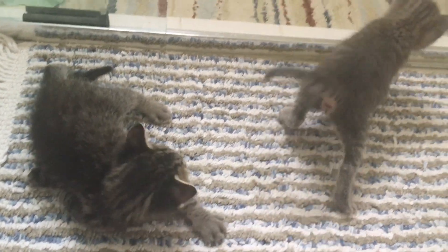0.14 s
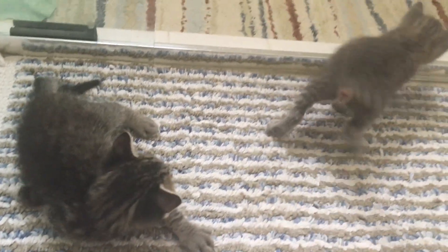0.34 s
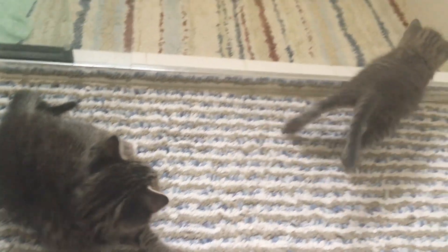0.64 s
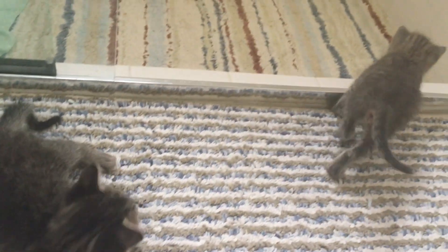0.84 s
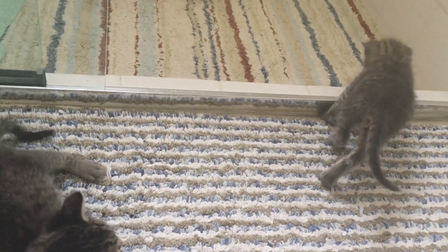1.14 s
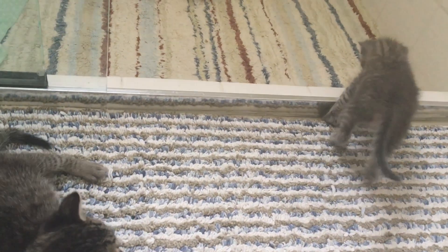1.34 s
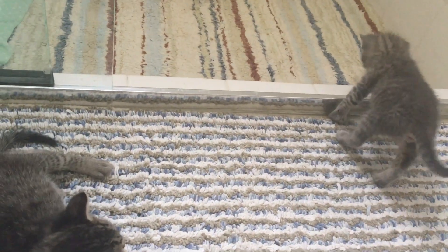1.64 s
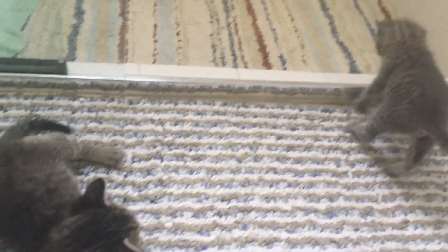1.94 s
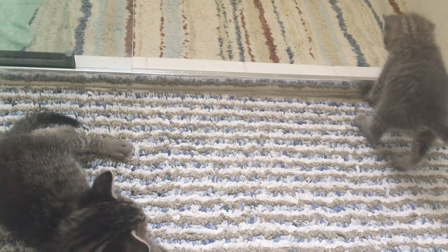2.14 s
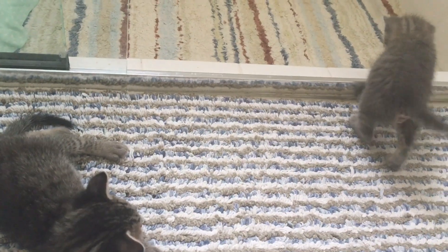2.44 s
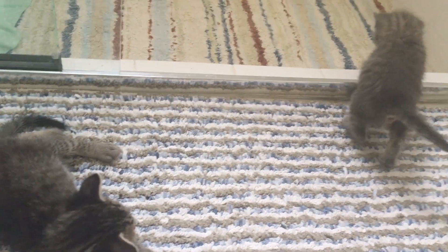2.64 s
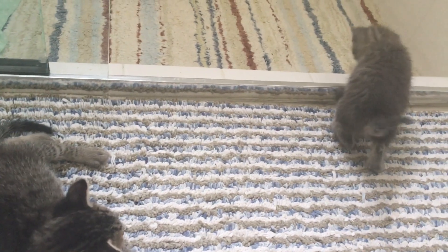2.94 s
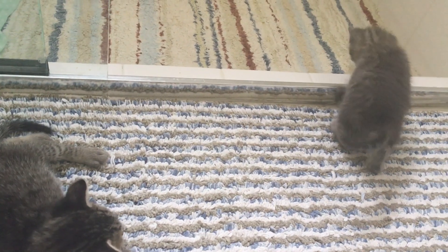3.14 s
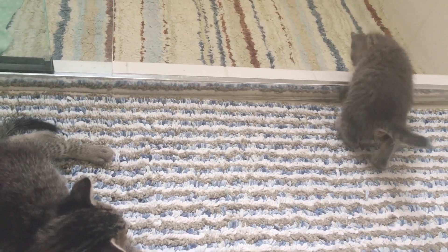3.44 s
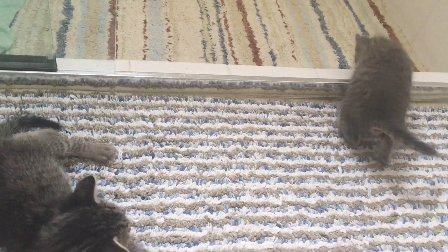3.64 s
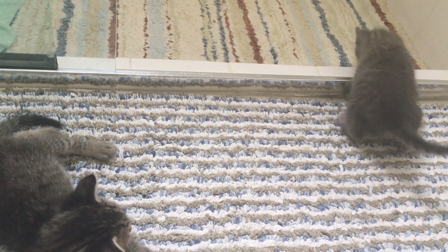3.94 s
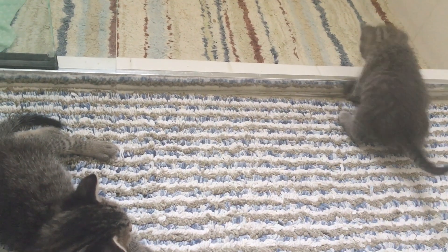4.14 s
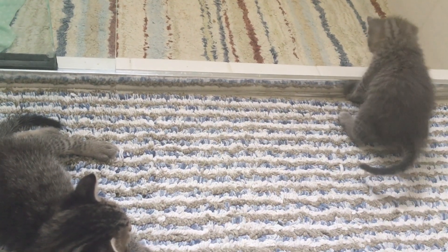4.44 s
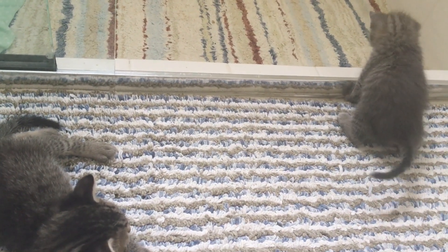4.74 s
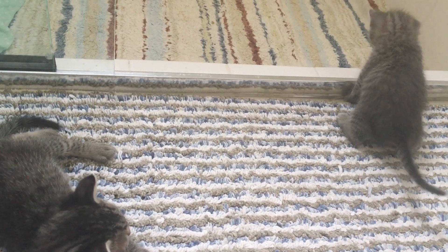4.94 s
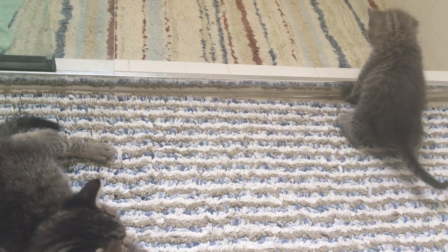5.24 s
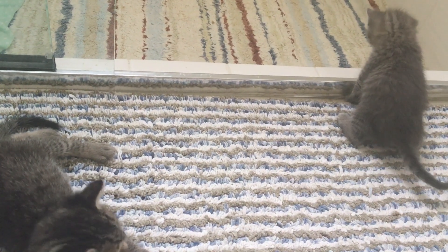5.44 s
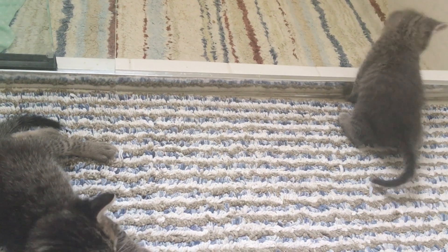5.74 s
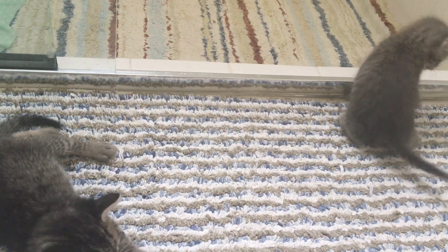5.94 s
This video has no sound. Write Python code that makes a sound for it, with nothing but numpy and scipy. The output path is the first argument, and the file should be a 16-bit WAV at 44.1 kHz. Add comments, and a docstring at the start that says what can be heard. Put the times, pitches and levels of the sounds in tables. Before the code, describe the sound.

A small, fairly live room, heard close to a rug. A brief scuff opens at 0 s, then a soft stroke swells around 0.3 s and firmer claw scratches follow at 0.7 and 0.9 s, fibres snapping over dragged backing. At 1.1-1.3 s paws knock and slide on a door sill; two more knocks with claw ticks come near 1.6 s. From 1.6 to 3.4 s, soft bodies land with low booms amid raspy rug strokes, strongest around 2.9 s, with one sharper sill tap at 2.25 s. After 3.7 s, a faint long rug stroke lies beneath dull knocks, short slides and claw ticks, clustered at 4.05-4.3 s and heaviest at 4.7-4.9 s. Then only sparse light ticks, and a final tap near 5.97 s. Steady hum, rumble and faint hiss persist; a distant engine drone emerges from 1.5 s, peaks near 3.9 s and keeps sinking in pitch.

```python
"""A kitten plays on a looped rug near the microphone, by a door sill in a small, fairly live room. First claws
comb the pile in strokes of snapping fibres and dragged backing; from 1.1 s paws knock and slide on the sill
too, as short puffs of stick-slip noise. From 1.6 to 3.4 s its body lands with a low boom. After 3.7 s the sill
leads, with claw ticks, over one long soft stroke. Throughout run a mains hum, a low rumble, faint hiss and a
distant engine, two sines that sink in pitch, faint at first and strongest near 3.9 s."""
import sys
import numpy as np
from scipy import signal
from scipy.fft import rfft, irfft, next_fast_len
from scipy.io import wavfile

SR = 44100
rng = np.random.default_rng(int(sys.argv[2]) if len(sys.argv) > 2 else 0)


def wrap_up_sound(samples):
    """Save the sound to the file named by the first command line argument, as 16-bit audio."""
    columns = np.atleast_2d(samples).T
    # keep every value between -1 and 1, then stretch to whole-number steps
    tamed = np.clip(columns, -1, 1)
    steps = np.round(tamed * 32767).astype(np.int16)
    wavfile.write(sys.argv[1], SR, steps)


N = 268128
T = np.arange(N) / SR
RING = T[:SR * 3 // 5]   # time axis of one short sound or room tail

# All levels in the event tables are relative: each source is trimmed again in scene().
# Strokes through the rug: peak_s (fastest moment), swell_s, release_s, drag_db (on the backing),
# hiss_db (fibres, over the drag), rasp_db (claws, over the drag)
RUG_STROKES = [(0.005, .02, 0.048, -53.5, -18, -15), (0.33, .32, 0.38, -60, -11, -6),
               (0.72, .13, .12, -52.5, -10.5, -7), (0.94, 0.066, 0.042, -49, -16, -13),
               (1.87, 0.053, 0.11, -53.5, -11.5, -4), (2.05, 0.098, .075, -49, -13.5, 0),
               (2.26, 0.07, 0.029, -55, -10, 1), (2.45, 0.091, 0.14, -63.5, -12, -5.5),
               (2.72, 0.066, 0.034, -63, -13.5, -7.5), (2.81, .014, 0.034, -55, -11, -2.5),
               (2.894, 0.068, 0.072, -45, -8.5, -2), (3.188, 0.098, 0.11, -50.5, -6.5, 0.5),
               (3.445, 0.057, 0.061, -50, -5.5, 0.5), (3.64, 0.2, 0.1, -62, -12, -4.5),
               (4.1, .3, 0.69, -68.5, -14, -8)]
# Colours of loops, backing and rasping claws: freq_hz, density_db (per Hz)
FIBRE_COLOUR = [(2000, -10), (3400, 7), (4800, -0.5), (6400, 0.5), (7600, -5.5), (9000, -3.5), (10300, -10),
                (11800, -6.5), (15500, -11.5)]
BACKING_COLOUR = [(120, -9.5), (250, 0), (340, -5), (500, 0), (900, 0), (1500, -1.5), (2100, -9.5),
                  (3000, -25.5)]
RASP_COLOUR = [(1200, 4), (1550, 2.5), (1850, 6), (2150, 6), (2500, 3.5), (3500, -10.5), (4800, -22.5)]
DRAG_JUDDER_DB, RASP_JUDDER_DB = 0.97, 2.0   # spread of the unevenness as a paw catches on the ribs


def rug_strokes(fibre_db, backing_db, rasp_db):
    """Loops of pile snap off the rasping claws, while the paw drags the backing over the floor."""
    drag, hiss, bite = np.zeros((3, N))
    for peak_s, swell_s, release_s, drag_db, hiss_db, bite_db in RUG_STROKES:
        effort = from_db(drag_db) * paw_speed(peak_s, swell_s, release_s)
        # overlapping strokes add as powers
        drag = np.hypot(drag, effort)
        hiss = np.hypot(hiss, from_db(hiss_db) * effort)
        bite = np.hypot(bite, from_db(bite_db) * effort)
    fibres = colour(slips(per_s=5000, spread_db=-0.5), FIBRE_COLOUR) * hiss
    backing = colour(slips(per_s=1600, spread_db=1.0), BACKING_COLOUR) * drag * judder(DRAG_JUDDER_DB)
    rasp = colour(slips(per_s=1300, spread_db=0.0), RASP_COLOUR) * bite * judder(RASP_JUDDER_DB)
    return from_db(fibre_db) * fibres + from_db(backing_db) * backing + from_db(rasp_db) * rasp


# Paws sliding on the sill: peak_s (fastest moment), swell_s, release_s, level_db, rasp_db (over the level)
SILL_SLIDES = [(1.12, 0.025, 0.026, -54.5, -20), (1.212, 0.027, .032, -38.5, -8),
               (1.268, 0.015, 0.082, -48.5, -8), (2.334, 0.014, 0.011, -56.5, 10.5),
               (3.77, 0.11, .17, -59.5, -6), (4.03, 0.071, .03, -57, -28), (4.094, 0.023, 0.028, -43, -23),
               (4.22, 0.032, 0.024, -50.5, 0), (4.32, 0.042, 0.073, -56.5, -16),
               (4.574, 0.019, 0.016, -62, -19), (4.684, 0.011, 0.02, -45, -24),
               (4.942, 0.016, 0.019, -50, 5), (5.84, .015, 0.02, -74, -6)]
# Colour of a pad on the sill: freq_hz, density_db (per Hz)
SLIDE_COLOUR = [(150, -20), (330, -9), (550, -7.5), (900, -2), (1350, 0.5), (1750, -3), (2300, -12.5),
                (5000, -35.5), (12000, -44)]


def sill_slides(pad_db, rasp_db):
    """A paw sticks and slips along the sill in quick succession while its claws rasp."""
    drag, bite = np.zeros((2, N))
    for peak_s, swell_s, release_s, level_db, bite_db in SILL_SLIDES:
        effort = from_db(level_db) * paw_speed(peak_s, swell_s, release_s)
        drag = np.hypot(drag, effort)
        bite = np.hypot(bite, from_db(bite_db) * effort)
    pad = colour(slips(per_s=2200, spread_db=-0.5), SLIDE_COLOUR) * drag
    rasp = colour(slips(per_s=1500, spread_db=3.5), RASP_COLOUR) * bite
    return from_db(pad_db) * pad + from_db(rasp_db) * rasp


# Paws knocking on the sill: start_s, level_db, treble_db (hardness)
SILL_KNOCKS = [(1.102, -48, -26), (1.16, -41, -10), (1.533, -49, -22), (1.612, -40, -10.5),
               (2.248, -45.5, 0), (4.055, -49.5, -5), (4.193, -44.5, -18), (4.303, -43, -28),
               (4.665, -35, -36), (4.923, -37, -3.5), (5.179, -59, -7), (5.965, -49, 5)]
# Colour of a knock: freq_hz, density_db (per Hz)
KNOCK_COLOUR = [(130, -14), (300, -4), (500, -2), (650, 4.5), (900, 2), (1200, 2), (1700, -1), (2400, -7.5),
                (3800, -10.5), (4800, -31), (12000, -33.5)]
KNOCK_CONTACT_S = 0.0097


def knocks(level_db, treble_db, wet):
    """Dull blows; the harder the contact, the more treble it carries."""
    out = np.zeros(N)
    for start_s, knock_db, hard_db in SILL_KNOCKS:
        grains = colour(slips(per_s=3200, spread_db=2.5, size=len(RING)), KNOCK_COLOUR)
        dull, hard = split(grains, hz=1680)
        blow = touch(dull + from_db(hard_db + treble_db) * hard, KNOCK_CONTACT_S)
        add(out, from_db(knock_db + level_db) * room(blow, wet), start_s)
    return out


# Claw tips catching: start_s, level_db, edge_db (share of the top above about 7 kHz)
CLAW_CATCHES = [(1.165, -50.5, -9), (1.541, -60, -18), (1.618, -49, -13), (3.75, -47.5, -10),
                (4.056, -58, -26), (4.194, -56.5, -1), (4.255, -57, -30), (4.36, -67, 4), (4.484, -64, 3),
                (4.566, -63.5, 4), (4.807, -55, -21), (4.831, -50, -24), (4.927, -45, -41),
                (5.035, -59, -13), (5.085, -50.5, -22), (5.639, -54.5, -33), (5.69, -63, -30),
                (5.968, -51, -29)]
# Colour of a claw tip: freq_hz, density_db (per Hz)
CLAW_COLOUR = [(600, -2.5), (1500, -9.5), (2400, 1), (3600, 1.5), (5000, -5.5), (6400, -7), (8000, -13),
               (10300, -20), (12000, -18.5), (15500, -25)]
CLAW_CONTACT_S = 0.018


def claw_ticks(level_db, treble_db, wet):
    """A claw tip catches and skips off in a short crackle."""
    out = np.zeros(N)
    for start_s, tick_db, edge_db in CLAW_CATCHES:
        grains = colour(slips(per_s=5000, spread_db=4.0, size=len(RING)), CLAW_COLOUR)
        body, edge = split(grains, hz=7050)
        tick = touch(body + from_db(edge_db + treble_db) * edge, CLAW_CONTACT_S)
        add(out, from_db(tick_db + level_db) * room(tick, wet), start_s)
    return out


# Body weight landing on the floor: start_s, level_db, push_s, boom_db (floor boom over the pad)
BODY_STEPS = [(1.601, -54, .04, 5), (1.88, -48, 0.022, -12), (1.961, -43, 0.1, 4), (2.06, -56, 0.078, -14),
              (2.824, -43, 0.035, -3), (3.18, -49.5, 0.025, -9), (3.409, -54, 0.048, 5)]
# Colour of a soft pad: freq_hz, density_db (per Hz)
STEP_COLOUR = [(70, -19), (150, 3.5), (220, 6), (330, 2), (480, -4.5), (800, -12.5), (2000, -60)]


def steps(level_db, boom_hz):
    """Soft pads push on the floor, which answers with a low boom."""
    out = np.zeros(N)
    boom = np.sin(2 * np.pi * boom_hz * RING)
    for start_s, step_db, push_s, boom_db in BODY_STEPS:
        pad = colour(rng.standard_normal(len(RING)), STEP_COLOUR)
        push = touch(pad, push_s) + from_db(boom_db) * touch(boom, push_s)
        # a longer push carries more energy at the same level
        add(out, from_db(step_db + level_db) * np.sqrt(push_s * SR) * push, start_s)
    return out


# Distant engine, pitch: time_s, pitch_hz
ENGINE_PITCH_CURVE = [(0, 86.3), (1.1, 85.9), (2.3, 82.25), (3.3, 79.1), (4.2, 73.4), (6.08, 67)]
# Distant engine, level of the fundamental before its trim: time_s, level_db
ENGINE_LEVEL_CURVE = [(0.0, -79), (0.81, -67), (1.52, -57), (1.64, -53.5), (2.13, -55.5), (2.47, -46.5),
                      (2.78, -54), (3.91, -38.5), (4.06, -42), (4.38, -40), (5.13, -47.5), (5.25, -53),
                      (5.69, -43.5), (6.08, -47)]
OCTAVE_DB, OCTAVE_FOLLOWS = -74, .5   # rms at the engine's mean level; share of its swing in dB


def engine(level_db):
    """A distant engine's sinking drone: a sine and its octave, which swings less in level."""
    curve_db = in_time(ENGINE_LEVEL_CURVE)
    phase = 2 * np.pi * np.cumsum(in_time(ENGINE_PITCH_CURVE)) / SR
    fundamental = from_db(curve_db + level_db) * np.sin(phase)
    octave_db = OCTAVE_DB + OCTAVE_FOLLOWS * (curve_db - curve_db.mean())
    return np.sqrt(2) * (fundamental + from_db(octave_db) * np.sin(2 * phase))


def mains_hum(hum_hz, rms_db):
    """One steady sine of the mains, starting at a random phase."""
    return np.sqrt(2) * from_db(rms_db) * np.sin(2 * np.pi * (hum_hz * T + rng.random()))


# Colours of the low rumble and the faint hiss: freq_hz, density_db (per Hz)
RUMBLE_COLOUR = [(20, -23), (32, -26), (42, 0.5), (52, -29), (65, 10), (85, -7), (110, -2.5), (170, -25.5),
                 (300, -19.5)]
AIR_COLOUR = [(150, 3.5), (300, -0.5), (550, -9.5), (900, -9), (1500, -10.5), (2600, -17.5), (4700, -21),
              (7000, -22.5), (15500, -26.5)]


def rumble_and_air(rumble_db, air_db):
    """Two steady coloured noises: a low rumble and a faint hiss."""
    rumble = from_db(rumble_db) * colour(rng.standard_normal(N), RUMBLE_COLOUR)
    air = from_db(air_db) * colour(rng.standard_normal(N), AIR_COLOUR)
    return rumble + air


# Resonances of floor and sill: freq_hz, width_hz, lift_db
FLOOR_RESONANCES = [(224, 11, -0.5), (290, 16, 1.5), (346.3, 17.7, 12), (466, 13, 7.5), (712, 26, 4),
                    (859, 31.5, 6.5), (1037, 19, 2), (1124, 34, -2), (1321, 6.4, 6), (1485, 36, 0.5),
                    (1870, 90, 1.5)]


def floor_ring(x):
    """Narrow resonances of floor and sill recolour the sound."""
    out = x
    for hz, width_hz, lift_db in FLOOR_RESONANCES:
        b, a = signal.iirpeak(hz, hz / width_hz, fs=SR)
        out = out + (from_db(lift_db) - 1) * signal.lfilter(b, a, x)
    return out


# Ring of the room: freq_hz, t60_s
ROOM_DECAY = [(150, 0.57), (1000, 0.41), (3000, 0.3), (7000, 0.26), (15000, 0.15)]


def room(x, wet):
    """Direct sound plus a random diffuse tail, new at each call, that dies sooner in the treble."""
    hz, t, cells = signal.stft(rng.standard_normal(len(RING)), SR, nperseg=256)
    dying = from_db(-60 * t / at_hz(ROOM_DECAY, hz)[:, None])
    tail = signal.istft(cells * dying, SR)[1]
    tail = tail / np.sqrt(np.sum(tail ** 2))
    # wet is the tail's share of the energy
    return np.sqrt(1 - wet) * x + np.sqrt(wet) * signal.fftconvolve(x, tail)[:len(x)]


SWELL_SHAPE, RELEASE_SHAPE = 2.13, 2.1   # 2 = a bell; more = flatter top and steeper flanks


def paw_speed(peak_s, swell_s, release_s):
    """A paw speeds up, then slows to rest; 1 at its fastest."""
    rising = np.maximum(peak_s - T, 0) / swell_s
    falling = np.maximum(T - peak_s, 0) / release_s
    return np.exp(-np.minimum(rising ** SWELL_SHAPE + falling ** RELEASE_SHAPE, 20))


def judder(depth_db, ribs_per_s=60):
    """A gain that glides to a new random value at each rib of the rug."""
    return from_db(depth_db * np.interp(T * ribs_per_s, np.arange(2000), rng.standard_normal(2000)))


def slips(per_s, spread_db, size=N):
    """Stick and slip: tiny releases of uneven size at random moments; rms 1."""
    heights = from_db(spread_db * np.minimum(rng.exponential(1, size), 4))
    happens = rng.random(size) < per_s / SR
    return rms_one(happens * heights * rng.choice([-1, 1], size))


def touch(grains, length_s):
    """One contact: a puff of the given sound that swells quickly and lets go; energy 1."""
    age = RING / length_s
    puff = grains * age ** .8 * np.exp(-np.minimum(age, 7) ** 2)
    return puff / np.sqrt(np.sum(puff ** 2) + 1e-20)


def colour(x, spectrum):
    """Give x a smooth spectrum that falls away past both ends; rms 1."""
    size = next_fast_len(len(x) + 2048)
    hz = np.arange(size // 2 + 1) * SR / size
    ends = np.minimum(hz / spectrum[0][0], 1) ** 2 / np.maximum(hz / spectrum[-1][0], 1) ** 2
    gain = from_db(at_hz(spectrum, hz)) * ends
    return rms_one(irfft(rfft(x, size) * gain, size)[:len(x)])


def split(x, hz):
    """The parts of x below and above hz."""
    low = signal.sosfiltfilt(signal.butter(2, hz, fs=SR, output="sos"), x)
    return low, x - low


def from_db(db):
    """Decibels to gain."""
    return 10 ** (np.asarray(db) / 20)


def rms_one(x):
    """Scale to rms 1."""
    return x / np.sqrt(np.mean(x ** 2) + 1e-20)


def at_hz(points, hz):
    """Read a table on a log-frequency axis."""
    f, value = np.transpose(points)
    return np.interp(np.log(hz + 1e-6), np.log(f), value)


def in_time(rows):
    """Join the points of a curve by straight lines."""
    return np.interp(T, *np.transpose(rows))


def add(out, sound, start_s):
    """Mix a short sound in at its moment."""
    at = round(start_s * SR)
    out[at:at + len(sound)] += sound[:N - at]


def scene():
    """The rug is near the microphone; the knocks and ticks come mostly through the room."""
    strokes = room(rug_strokes(fibre_db=0.7, backing_db=-1.0, rasp_db=-1.5), wet=0.18)
    slides = room(sill_slides(pad_db=0.5, rasp_db=-7.0), wet=0.32)
    blows = knocks(level_db=21.5, treble_db=7.5, wet=0.57)
    ticks = claw_ticks(level_db=20.5, treble_db=17.5, wet=0.57)
    pads = room(steps(level_db=-7.0, boom_hz=96.8), wet=0.33)
    kitten = floor_ring(strokes + slides + blows + ticks + pads)
    drones = engine(level_db=0.5) + mains_hum(hum_hz=119.35, rms_db=-58)
    return (kitten + drones + rumble_and_air(rumble_db=-60.5, air_db=-72))[None]


CUTOFF_HZ = 15700


def record(dry):
    """The top is cut steeply by an elliptic low-pass."""
    lowpass = signal.ellip(10, .2, 70, CUTOFF_HZ, fs=SR, output="sos")
    return signal.sosfilt(lowpass, dry)


dry = scene()
out = record(dry)
wrap_up_sound(out)
```